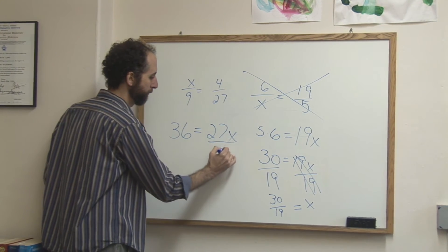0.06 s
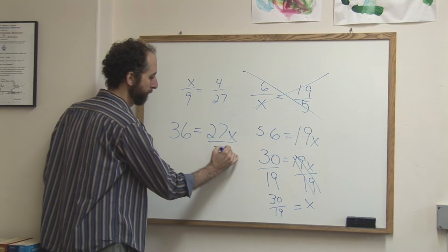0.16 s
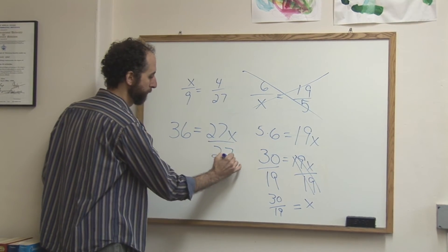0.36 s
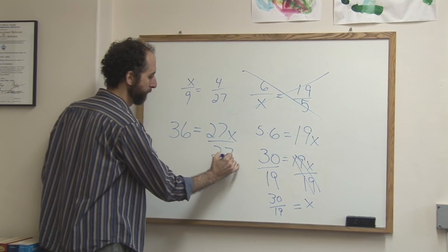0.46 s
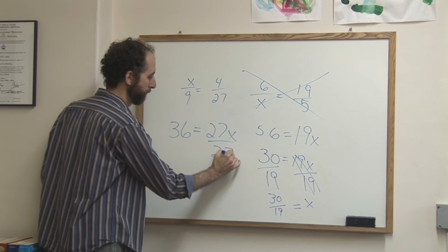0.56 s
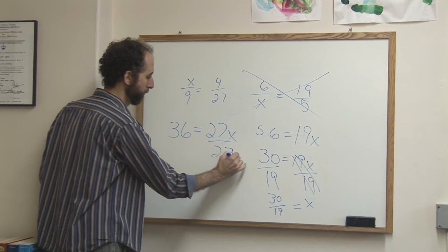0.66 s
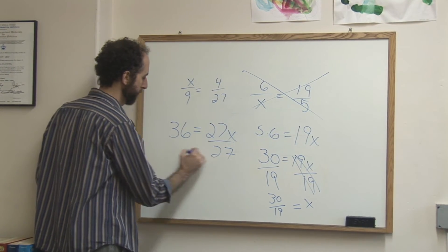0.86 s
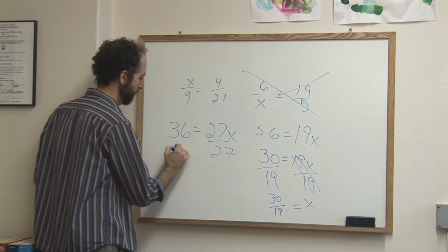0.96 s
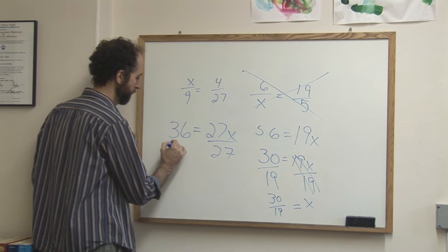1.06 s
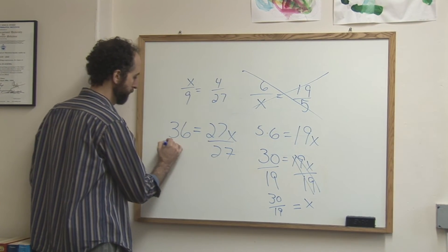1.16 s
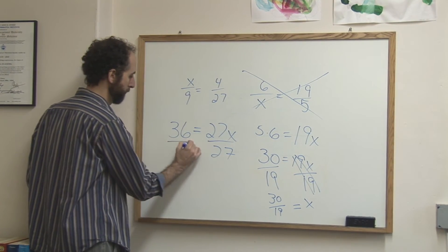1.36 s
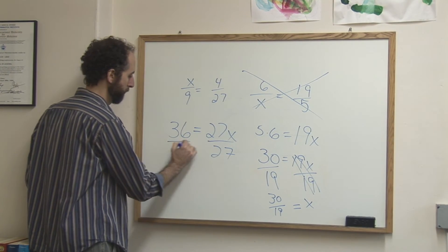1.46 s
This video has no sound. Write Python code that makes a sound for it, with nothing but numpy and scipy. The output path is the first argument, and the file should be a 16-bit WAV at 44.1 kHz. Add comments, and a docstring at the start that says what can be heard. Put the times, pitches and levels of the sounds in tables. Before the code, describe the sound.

A felt marker writes on a whiteboard in short strokes. At about 0.15 seconds the tip lands with a hollow, ringing knock and rubs with a faint, juddering hiss. A second knock and stroke come at 0.55, ending in a tiny squeak near 0.7. At 1.2 a softer, duller knock starts the last stroke. Quiet ventilation rumble, hum and hiss continue throughout in the small, slightly echoing classroom.

```python
"""Ventilation rumble, mains hum and steady hiss fill a small classroom from the start.
A felt marker judders on a wall-hung whiteboard, then knocks the panel into a hollow ring and rubs on
with a faint hiss. A second knock and stroke follow at half a second, ending in a tiny squeak.
At 1.2 s a softer, duller knock opens the last juddering stroke. Near walls echo every touch."""
import sys
import numpy as np
from scipy import signal
from scipy.fft import rfft, irfft
from scipy.io import wavfile

SR = 44100
rng = np.random.default_rng(int(sys.argv[2]) if len(sys.argv) > 2 else 0)


def output_pcm(signal):
    """Save a mono or channel-first signal as 16-bit PCM at the path in sys.argv[1].

    Samples are clipped to [-1, 1] before scaling.
    """
    pcm = np.clip(np.atleast_2d(signal).T, -1, 1) * 32767
    wavfile.write(sys.argv[1], SR, np.round(pcm).astype(np.int16))


N = 66150


def undb(db):
    """Decibels to gain."""
    return 10 ** (np.asarray(db) / 20)


def unit(x):
    """Scale to rms 1."""
    return x / np.sqrt(np.mean(x ** 2))


def seconds():
    """Time of every sample."""
    return np.arange(N) / SR


def band(x, hz, width_hz):
    """One resonance, gain 1 at its centre."""
    return signal.lfilter(*signal.iirpeak(hz, hz / width_hz, fs=SR), x)


def steep_band(x, hz, width_hz):
    """The same resonance twice, for steeper skirts."""
    return band(band(x, hz, width_hz), hz, width_hz)


def noise(hz, width_hz):
    """Noise in a steep band, rms 1."""
    return unit(steep_band(rng.standard_normal(N), hz, width_hz))


def rolloff(x, hz, kind, order):
    """Low-pass or high-pass."""
    return signal.sosfilt(signal.butter(order, hz, kind, fs=SR, output="sos"), x)


def shaped_noise(curve):
    """White noise through an EQ curve of (f/Hz, level/dB) points."""
    hz, db = np.array(curve).T
    f = np.maximum(np.fft.rfftfreq(N, 1 / SR), 1)
    gain = undb(np.interp(np.log(f), np.log(hz), db))
    return irfft(rfft(rng.standard_normal(N)) * gain, N)


def delay(x, s):
    """Shift later by s seconds."""
    return np.interp(seconds() - s, seconds(), x, left=0)


def pressure(start, length, attack_s, release_s):
    """Envelope of the pressure on the tip; the release is half done at start + length."""
    t = seconds() - start
    return np.clip(t / attack_s, 0, 1) * np.clip((length - t) / release_s + .5, 0, 1)


def drift(rate_hz):
    """Random modulator, spread near 1."""
    return np.interp(seconds() * rate_hz, np.arange(256), rng.standard_normal(256))


# EQ curve of the air bed: f/Hz, relative level/dB
AIR_CURVE = [(20, -41), (35, -4.5), (48, -4), (70, -8.5), (100, -10), (160, -12.5), (250, -16),
             (400, -22.5), (600, -26.5), (1000, -30.5), (2000, -35), (5000, -38), (10000, -41),
             (14000, -43)]

def ventilation():
    """Moving air lays down a low rumble that thins into steady hiss."""
    return undb(-51.5) * unit(shaped_noise(AIR_CURVE))


# low drone and mains tone: f/Hz, level/dB
HUM_TONES = [(35.3, -56.5), (120, -57.5)]

def hum():
    """Two low tones hum, each wavering slightly in level."""
    waver_db = 2.5
    out = 0
    for hz, db in HUM_TONES:
        gain = undb(db + waver_db * drift(rate_hz=6.64))
        out += gain * unit(np.sin(2 * np.pi * (hz * seconds() + rng.random())))
    return out


# panel modes, woken by judders and knocks alike: f/Hz, level/dB, t60/s
PANEL_MODES = [(139, -23, 0.04), (233.6, -52.5, 0.26), (271, -39.5, 0.16), (343.9, -30.5, 0.53),
               (366.2, -20, 0.5), (374, -18, 0.028), (425.6, -32, 0.31), (503.9, -21.5, 0.098),
               (524.5, -37, 0.13), (598, -39, 0.34), (623, -31.5, 0.059), (726, -33.5, 0.094),
               (785, -37.5, .13), (848, -51, 0.29), (978, -40, 0.14), (1130, -39, 0.097),
               (1327, -30.5, 0.099), (1630, -25.5, 0.15)]
# stick-slip cues: t/s, length/s, level/dB, centre f/Hz, width/Hz
JUDDER_CUES = [(0.071, 0.055, -52.5, 350, 98), (0.222, 0.014, -40, 742, 614), (0.231, 0.022, -38, 466, 280),
               (0.241, 0.11, -55, 670, 395), (0.56, 0.063, -57, 980, 550), (1.211, 0.029, -51.5, 524, 247),
               (1.241, 0.12, -54, 1116, 460), (1.291, 0.039, -48, 353, 69), (1.337, 0.046, -56, 740, 347)]

def judder():
    """The dragged tip sticks and slips unevenly, shaking the panel and waking its modes."""
    median_slips_per_s, ring_db = 420, 5
    out = 0
    for start, length, db, hz, width_hz in JUDDER_CUES:
        pace = np.exp(.5 * np.repeat(rng.standard_normal(N), 64)[:N])
        cycles = np.cumsum(pace) * median_slips_per_s / SR
        slips = np.diff(np.floor(cycles), prepend=0)  # one click a cycle
        shake = rolloff(steep_band(slips, hz, width_hz), 1.55 * hz, "low", order=6)
        ring = sum(band(shake, f, np.log(1000) / (np.pi * t60)) for f, _, t60 in PANEL_MODES)
        envelope = pressure(start, length, attack_s=0.29 * length, release_s=0.76 * length)
        out += undb(db) * unit(shake + undb(ring_db) * ring) * envelope
    return out


# upper resonances of the pen: f/Hz, width/Hz, level/dB
PEN_RESONANCES = [(6260, 540, -4.5), (6700, 2600, -9.5), (10700, 800, -10.5)]
# sliding-tip cues: t/s, length/s, level/dB, tip resonance f/Hz
STROKE_CUES = [(0.152, 0.11, -63, 4780), (0.261, 0.11, -62.5, 5180), (0.533, 0.087, -61, 4800),
               (1.199, 0.16, -58.5, 4170)]

def rubbing():
    """Felt fibres catch in dense grains that hiss through the pen's resonances."""
    grain_db, felt_db = 2, -9.5
    out = 0
    for start, length, db, tip_hz in STROKE_CUES:
        grains = rng.standard_normal(N) * undb(grain_db * drift(rate_hz=170))
        tip = band(grains, tip_hz, width_hz=640)
        felt = undb(felt_db) * rolloff(grains, 830, "high", order=2)
        pen = sum(undb(level) * steep_band(grains, hz, width) for hz, width, level in PEN_RESONANCES)
        envelope = pressure(start, length, attack_s=0.03, release_s=0.033)
        out += undb(db) * unit(tip + felt + pen) * envelope
    return out


# tip landings: t/s, knock level/dB, low-pass f/Hz, ring-time ratio, crack level/dB, after-ring level/dB
KNOCK_CUES = [(0.1534, -3, 695, 1.2, -42, -37), (0.5433, -3, 564, 1, -47.5, -35),
              (1.2, -6.5, 315, 0.58, -64, -50)]

def knocks():
    """The tip lands with a faint crack, the panel rings; a low, wavering after-ring lingers in the room."""
    crack_decay_s, tick_decay_s = 0.0097, 0.00087
    after_ring_rise_s, after_ring_t60_s = 0.06, 0.58
    t = seconds()
    out = 0
    for start, knock_db, contact_hz, ring_ratio, crack_db, after_ring_db in KNOCK_CUES:
        ring = sum(undb(db - 60 * t / (t60 * ring_ratio)) * np.sin(2 * np.pi * hz * t)
                   for hz, db, t60 in PANEL_MODES)
        radiated = rolloff(ring, 318, "high", order=2)  # the panel radiates little bass
        knock = rolloff(radiated, contact_hz, "low", order=4)
        crack = np.exp(-t / crack_decay_s) * noise(830, width_hz=780)
        tick = undb(-20) * np.exp(-t / tick_decay_s) * noise(2000, width_hz=3000)
        fade = undb(after_ring_db - 60 * t / after_ring_t60_s) * (1 - np.exp(-t / after_ring_rise_s))
        after_ring = fade * noise(387.4, width_hz=106)
        out += delay(undb(knock_db) * knock + undb(crack_db) * (crack + tick) + after_ring, start)
    return out


def squeak():
    """The tip grips and sings a rising chirp for a few milliseconds."""
    start_s, rise_s, peak_db = 0.6762, 0.00074, -43.5
    start_hz, glide_hz_per_s = 4380, 34000
    t = np.maximum(seconds() - start_s, 0)
    swell = t / rise_s * np.exp(1 - t / rise_s)
    return undb(peak_db) * swell * np.sin(2 * np.pi * (start_hz + glide_hz_per_s * t / 2) * t)


# early reflections off near surfaces: delay t/s, level/dB
REFLECTIONS = [(.0046, -10), (.01736, -10), (.0365, -20), (.0662, -19), (.0731, -20), (.0838, -17.5),
               (.1263, -20.5), (.1584, -22)]
# EQ curve of the reverb tail: f/Hz, level/dB
TAIL_CURVE = [(80, 0), (250, -7), (370, -16), (700, -10), (1500, -12), (4000, -17.5), (12000, -7)]

def classroom(x):
    """The direct sound and its dull echoes off near surfaces feed a short diffuse tail."""
    t60_s, build_s = 0.27, 0.024
    t = seconds()
    fade = undb(-60 * t / t60_s) * (1 - np.exp(-t / build_s))
    tail = shaped_noise(TAIL_CURVE) * fade / np.sqrt(np.sum(fade ** 2))
    dull = rolloff(x, 1550, "low", order=1)
    early = x + sum(undb(db) * delay(dull, s) for s, db in REFLECTIONS)
    return early + signal.fftconvolve(early, tail)[:N]


def scene():
    """Mono mix: the bed of air and hum under the marker in its room."""
    bed = ventilation() + hum()
    marker = judder() + rubbing() + knocks() + squeak()
    return (bed + classroom(marker))[None]


def record(dry):
    """A steep low-pass trims the top of the mix."""
    cutoff_hz = 13900
    return signal.sosfilt(signal.ellip(10, .2, 70, cutoff_hz, fs=SR, output="sos"), dry)


dry = scene()
out = record(dry)
output_pcm(out)
```